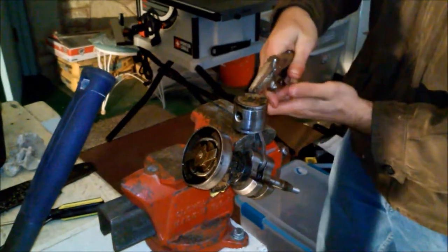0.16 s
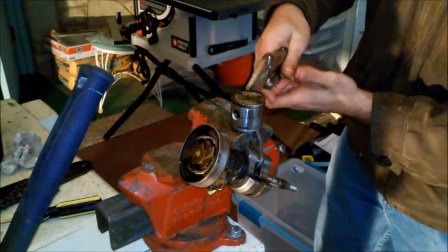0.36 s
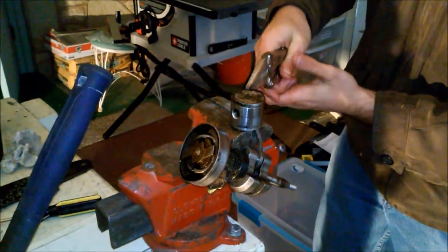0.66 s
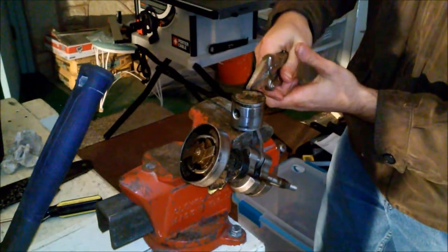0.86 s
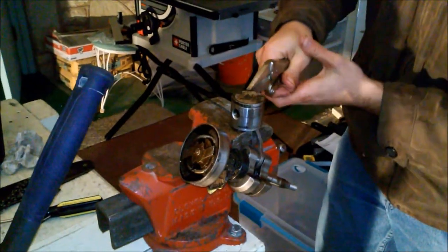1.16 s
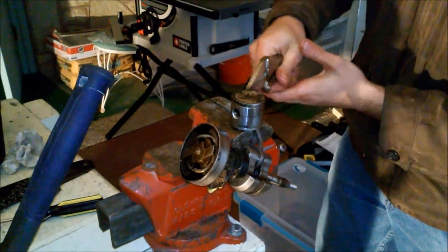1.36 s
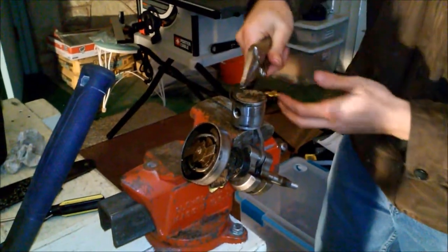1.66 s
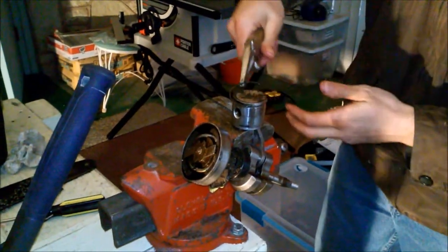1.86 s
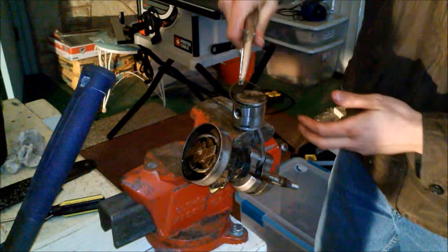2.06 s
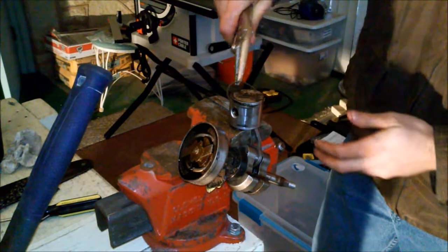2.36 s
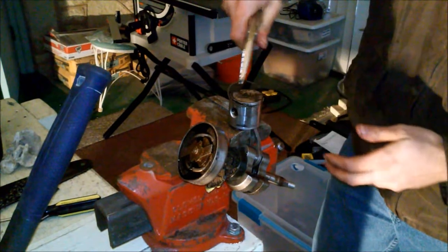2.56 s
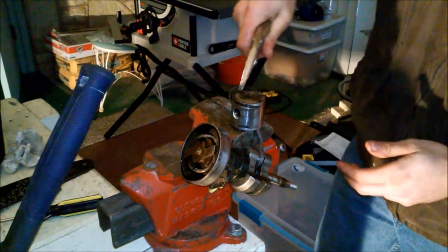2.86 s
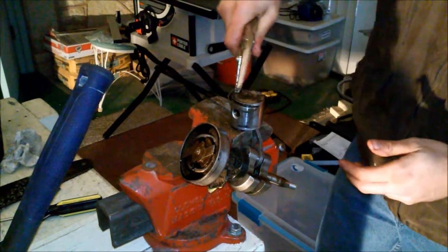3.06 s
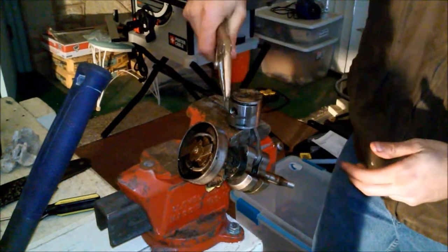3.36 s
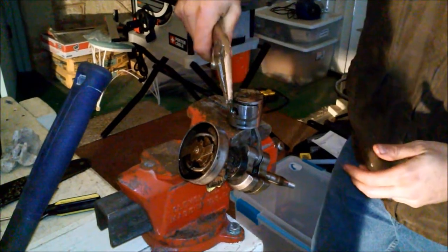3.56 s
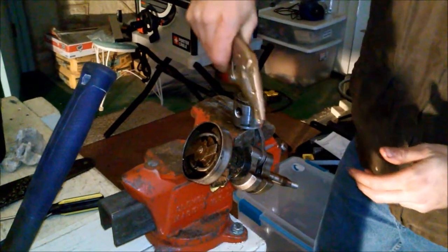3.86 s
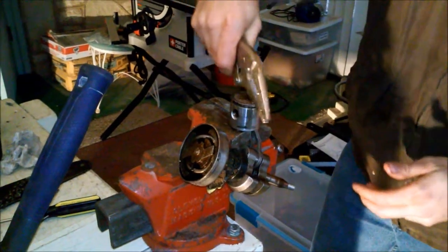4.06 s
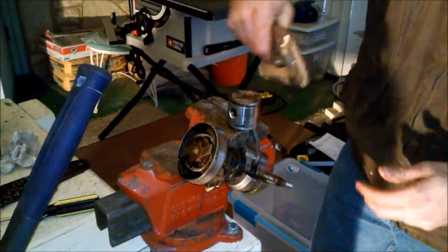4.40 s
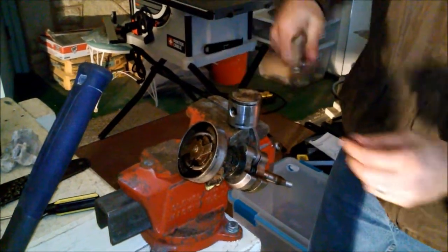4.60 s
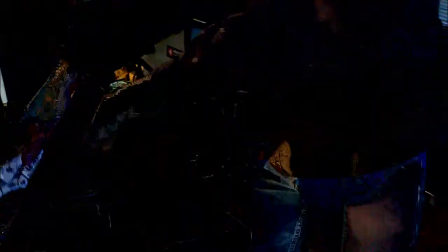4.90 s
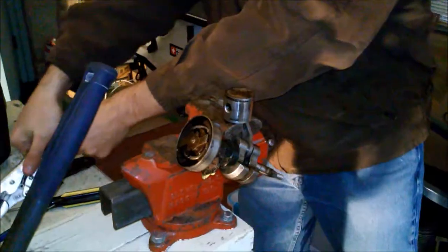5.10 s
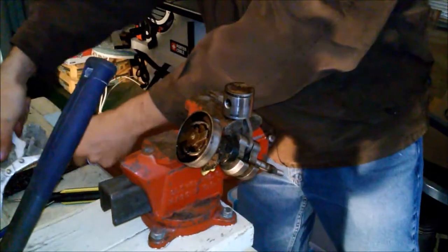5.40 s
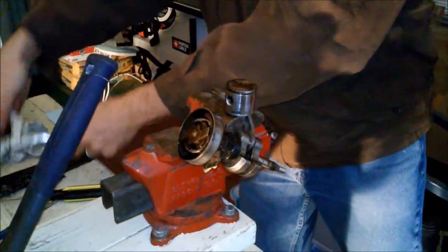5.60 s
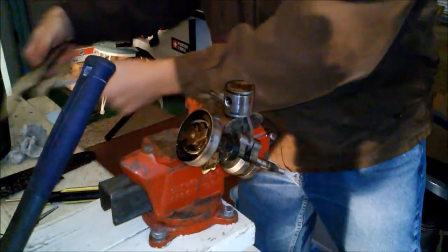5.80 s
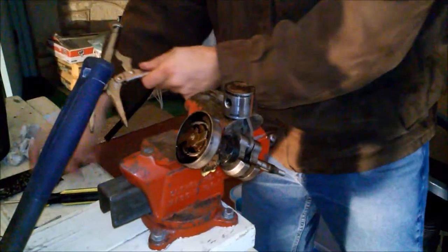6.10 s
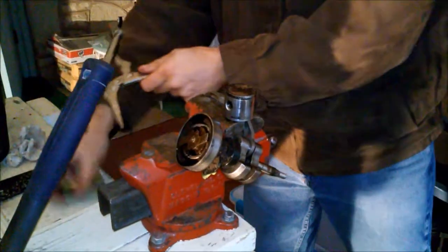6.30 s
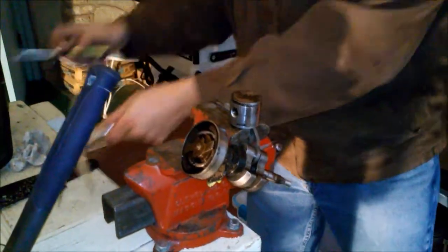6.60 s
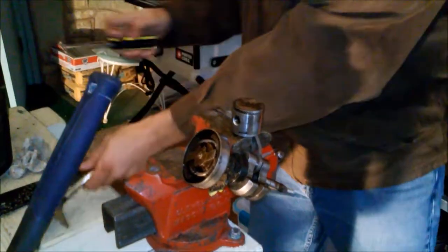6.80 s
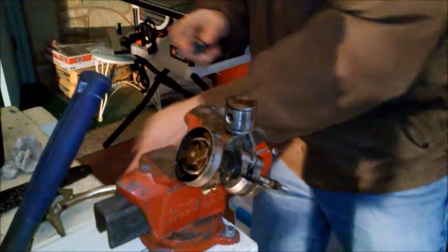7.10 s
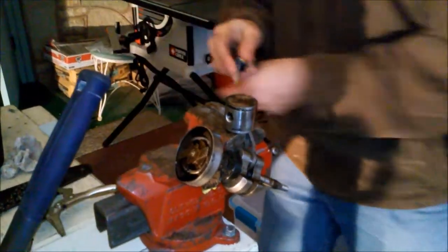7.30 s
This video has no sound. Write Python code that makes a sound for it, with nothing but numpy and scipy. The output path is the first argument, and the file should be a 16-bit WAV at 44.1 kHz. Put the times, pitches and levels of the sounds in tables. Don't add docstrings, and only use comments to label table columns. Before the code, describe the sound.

A close microphone in a small, hard-walled shed picks up hand tools on metal over low rumble and hiss, which swell after each contact and sink in pauses. At about 0.3-0.4 s pliers nudge and grip with quick, bright clicks. Around 1.0 s the jaws slip, then snap very loudly at 1.15 s, briefly overloading. A short squeak, dull knock and light flick follow at 1.65-1.75 s; a pin tap rings at 2.15 s. After a pause, a steel tool clinks at 3.8 s, ticks at 4.0 s and shuts sharply at 4.3 s. Fingers fumble faintly until 4.9 s. At 5.3-5.5 s tools are laid and dropped on the wooden bench, booming and clattering, with a light lift at 5.9 s and faint cloth rustle. Quiet until a brush at 6.8 s, then a heavy thud and clank at 6.9 s, jingling and rattling to 7.2 s, and a final click at 7.36 s.

```python
import sys
import numpy as np
from scipy import signal
from scipy.fft import rfft, irfft, next_fast_len
from scipy.io import wavfile
from scipy.ndimage import uniform_filter1d

SR = 44100
rng = np.random.default_rng(int(sys.argv[2]) if len(sys.argv) > 2 else 0)


def materialize(psi):
    bounded = np.clip(np.atleast_2d(psi).T, -1, 1)
    quanta = np.round(bounded * 32767).astype(np.int16)
    wavfile.write(sys.argv[1], SR, quanta)


def convert_level_to_amplitude(level_db):
    exponent = np.asarray(level_db, float) / 20
    return 10 ** exponent


N = 328540

# pitch_hz, width_hz, level_db (over the spectrum)
PLIERS_NUDGE = ([(0.283, -27, -12, 0.18)], [(290, -49), (500, -13), (2670, -18), (3670, -15), (12500, 3),
                (15800, -5)], [(3800, 200, 4), (6100, 200, 5.5)])
PLIERS_GRIP = ([(.352, -2.5, -12, .1), (.3615, -7, -5, .06), (.365, -5, -13, 0.25)], [(290, -51),
               (500, -27.5), (3470, -22), (4500, -20.5), (8130, -6.5), (13100, -3.5), (15800, -13)],
               [(1016, 55, 12.5), (4405, 360, 7), (6090, 200, .5), (13400, 150, 6.5)])
STEEL_SING = ([(.381, -15, -3, .07, .015)], [(4000, -40), (5000, -14), (10000, -8), (15800, 0.1)],
              [(5120, 60, 19), (7470, 80, 17), (10300, 60, 22), (15080, 50, 19)])
PLIERS_REGRIP = ([(.398, -2, -11, .09), (.406, -7, -15, .2), (.42, -27, -1, .5)], [(290, -51), (500, -23),
                 (1000, -20), (3780, -22), (15800, -4)], [(5990, 300, 7), (7300, 300, 3), (11500, 500, 1.5),
                 (15080, 45, 11)])
JAW_SLIP = ([(1.017, -23.5, -8, 0.4), (1.024, -4.5, -12, 0.22), (1.034, -13.5, -18, 0.4),
            (1.044, -11.5, -13, 0.4)], [(290, -44.5), (600, -22), (958, -14), (1280, -17.5), (1860, -17),
            (2500, -24), (3520, -27), (9950, 1.5), (15800, -11.5)], [(6100, 300, 1), (8700, 400, 9.3),
            (9950, 150, 3.4)])
JAW_SNAP = ([(1.148, -17, -12.5, 0.58), (1.158, 4.5, -7, 0.1), (1.165, -10.5, -2.5, 0.16, 0.9)],
            [(700, -32), (1400, -21), (4800, -21), (6640, -7.5), (8130, -14), (11200, -11), (13700, .5),
            (15800, -12.5)], [(1580, 110, 2), (2590, 94, -4), (4100, 300, -3), (6670, 170, 2.5),
            (10000, 900, 6)])
PLIERS_SQUEAK = ([(1.641, -24, -16, 0.4)], [(290, -46), (500, -17), (1780, -8), (3370, -28), (10700, -9),
                 (15800, -11)], [(1780, 73, 10.5), (5900, 460, 11), (11200, 1180, 4)])
PLIERS_CREAK = ([(1.682, -54, 1.2, 0.15)], [(1300, -30), (2050, 2), (6000, -12), (8000, -33)],
                [(2050, 120, 18), (5950, 100, 26)])
DULL_KNOCK = ([(1.72, -17, -8.5, 0.08), (1.745, -35, -1, 0.4)], [(180, -55), (300, -12), (458, 5),
              (640, -12), (1010, -9), (1220, -17.5), (5000, -37), (6500, -48.5)], [(990, 160, 5),
              (1970, 160, 7.2)])
BRIGHT_FLICK = ([(1.757, -20.5, -16, 0.17)], [(2500, -32), (8500, -17), (11400, -1), (15800, -17)],
                [(4400, 300, 5.6)])
PIN_TAP = ([(2.141, -2, -11, 0.49)], [(290, -21), (500, -4), (697, -29), (917, -19), (1250, -26),
           (5400, -24), (10500, 2), (15800, -4)], [(900, 60, 5.4), (1545, 140, 17), (1930, 220, 15),
           (2620, 51, 5.5), (4520, 300, 12), (6100, 400, 2)])
TOOL_TOUCH = ([(3.717, -41, -18, 0.3), (3.755, -15, -10, 0.4)], [(290, -56), (500, -24), (931, -21),
              (4560, -32.5), (7800, -24), (10500, -7.5), (15800, -12.5)], [(5870, 400, 14),
              (10840, 640, 5.6)])
TOOL_CLINK = ([(3.816, -13, -8, 0.04), (3.822, -15, -9, 0.55, 0.036)], [(180, -30), (300, -9), (927, -6.5),
              (3010, -15.5), (6040, -17), (7130, -26), (11300, -9), (15800, -14)], [(522, 50, 15),
              (983, 44, 3.2), (1600, 120, 6), (4400, 230, 3), (6000, 200, 3)])
CLINK_SPARK = ([(3.799, -11, -14, .09), (3.813, 4, -18, .09), (4.14, -30, -20, .14),
               (4.302, -13, -28, .09)], [(6000, -42), (9500, -10.5), (13000, 5), (15800, 1)], [])
TOOL_TICKS = ([(4.014, -17.5, -21.5, 0.39), (4.023, -30, -21, 0.35)], [(1470, -43), (4500, -36),
              (7080, -27), (7950, -19), (13000, -8.5), (15800, -19)], [(6050, 370, 9), (8200, 150, 9.9),
              (12900, 170, 6.7)])
TOOL_SHUT = ([(4.3021, -5.5, -16.5, 0.4), (4.3104, -14, -19, 0.4), (4.3214, -15, -14, 0.46)], [(880, -54),
             (1500, -35), (3900, -41), (6000, -33), (13100, 3.5), (15800, -16)], [(5050, 300, 11)])
FINGER_FUMBLE = ([(4.418, -52, -4, .15), (4.486, -43, -5, .2), (4.53, -53, -4, .2), (4.765, -54, -4, .15),
                 (4.796, -54, -4, .15), (4.91, -57, -4, .15)], [(350, -30), (650, 0.1), (1000, -2),
                 (1700, -12), (4000, -30)], [])
FAINT_PIP = ([(5.052, -62, -6.5, 0.14)], [(2000, -35), (2700, 1), (3800, -24)], [])
TOOL_LAY = ([(5.303, -9, -7.5, 0.55, 0.036), (5.314, -12, -15, 0.36)], [(196, -4), (501, -7), (615, -13.5),
            (2000, -27), (5500, -24), (8220, -19), (12900, -13), (15800, -16.5)], [])
BENCH_BUMP = ([(5.35, -3.5, -11, 0.28), (5.385, -12, -9, .2), (5.42, -11.5, -18.5, 0.5)], [(120, -44),
              (194, -2), (254, -15), (322, -4), (560, 0), (1500, -10), (3500, -24), (4550, -48)],
              [(586, 110, 2), (940, 73, 6)])
STEEL_DROP = ([(5.3657, -8.5, -7.5, 0.34), (5.3744, -8, -12.5, 0.26)], [(1180, -36), (2000, -6), (6500, -8),
              (8400, 0.5), (13400, -2.5), (15800, -14)], [(8417, 60, 9), (9420, 130, 9)])
STEEL_SETTLE = ([(5.421, -2, -12, .16), (5.433, -16, -9.5, 0.5), (5.5, -21.5, -10, 0.26)], [(710, -32),
                (1300, -4), (1800, -3), (2300, -16), (4620, -14), (12300, -4.5), (15800, -13)],
                [(10200, 490, 6.2), (12200, 500, 2)])
FAINT_CHIRP = ([(5.637, -62, 1.9, 0.4), (5.71, -65, 2.8, 0.25)], [(1200, -10.5), (1550, -1.5), (2000, -37)],
               [(1560, 45, 18)])
TOOL_LIFT = ([(5.91, -26, -17, 0.43)], [(1180, -57), (2000, -27), (5200, -4), (8330, 1), (15800, 3)],
             [(7400, 97, 15)])
CLOTH_RUSTLE = ([(6.03, -60, -1, .4), (6.254, -47, -9.5, 0.26), (6.29, -61, -5.5, 0.46)], [(240, -51.5),
                (400, -20), (856, -3.5), (1190, -20), (1920, -12.5), (2330, -26), (4000, -23), (5200, -54)],
                [(2670, 70, 4)])
HAND_BRUSH = ([(6.827, -25, -9, 0.5, 0.2)], [(90, -28), (426, 6), (800, -10), (1600, -12), (3280, -17),
              (7730, -26), (12600, -19.5), (15800, -33)], [(560, 150, 3), (888, 50, 3), (2760, 200, 5)])
BENCH_THUD = ([(6.9075, -1.2, -9.5, 0.29), (6.934, -4, -11, 0.42), (6.961, -8.5, -8, 0.58)], [(140, -24),
              (250, -1), (878, -4.5), (1170, -11), (1410, -1.5), (2520, -16), (7000, -30), (9100, -51)],
              [(480, 100, 1.5), (1450, 250, -1)])
BENCH_REBOUND = ([(7.142, -24, -5, .2)], [(250, -25), (520, -1), (1200, -16), (3000, -40)], [])
TOOLS_CLANK = ([(6.9077, -2, -13, 0.37), (6.9154, -2.5, -13.5, 0.43), (6.9526, -6.5, -13, 0.72)],
               [(1470, -36), (2500, -12.5), (3700, -14), (5500, -17), (9000, -5), (12600, 1.5),
               (15800, -10)], [(7480, 90, 8), (15100, 60, 6.9)])
TOOLS_JINGLE = ([(7.0569, -19, -11, 0.3), (7.0868, -19, -12, 0.5), (7.138, -33, -12, .3)], [(3500, -30),
                (5000, -12), (6140, 3), (8000, -5), (12500, 0), (15800, -3)], [(7400, 90, 10),
                (9600, 100, 8), (15100, 40, 17)])
TOOLS_RATTLE = ([(7.1826, -13, -12, 0.42)], [(1180, -44), (2000, -13), (4430, -19), (8400, -6), (15800, 0)],
                [(5140, 54, 6.2), (7470, 79, 10), (10100, 77, 6), (15100, 60, 8)])
TOOL_PICK = ([(7.357, -10, -11.5, 0.47)], [(180, -29), (425, -11), (1090, -17), (5000, -19), (12700, -0.5),
             (15800, -7.5)], [])

PIVOT_MODES = ([(.353, -27), (.365, -33), (.399, -30)], [(4450, 0, .03), (6050, -1, .03), (1016, -14, .3),
               (11600, -2, .04)])
HINGE_MODES = ([(1.024, -43), (1.044, -46), (1.09, -51)], [(960, -7, .4), (1100, -8, .4), (1798, -5, .18),
               (4005, -9, .12), (5259, -6, .33), (5814, -3, .3), (6212, -5, .5), (6546, 0, .2)])
JAW_MODES = ([(1.16, -33), (1.168, -32), (1.2, -33), (1.234, -32)], [(1620, -14, .25), (2590, -15, .3),
             (4100, -12, .25), (5400, -8, .3), (5819, -4, .3), (6665, -3, .32), (6804, -5, .3),
             (7208, -9, .35)])
HANDLE_MODES = ([(1.17, -38), (1.21, -39), (1.26, -40)], [(1150, 0, .4), (1480, -4, .4), (2550, -1, .35),
                (2850, -3, .35)])
HUM_MODES = ([(1.95, -70), (2.0, -73), (2.08, -71)], [(1850, 0, .4)])
PIN_MODES = ([(2.144, -40), (2.156, -42)], [(890, -10, .4), (1540, -6, .35), (1841, -9, .4),
             (2000, -8, .25), (2606, -14, .3), (4511, -7, .3), (4640, -10, .3), (6000, 5, .03),
             (4400, 2.5, .04)])
PISTON_MODES = ([(3.817, -33), (3.83, -37), (3.863, -36)], [(1000, -3, .35), (1500, -5, .2),
                (2000, -2, .12), (4600, -5, .05), (5200, -6, .04), (6050, -6, .25), (4400, -10, .4),
                (5000, -12, .4), (3100, -14, .4)])
PING_MODES = ([(4.303, -50)], [(5150, 0, .1)])
BENCH_TOUCHED_MODES = ([(5.3035, -25), (5.325, -29)], [(199, 0, .3), (323, -1, .4), (1000, -11, .15),
                       (560, -12, .2), (2400, -13, .12)])
BENCH_LAID_MODES = ([(5.35, -19), (5.369, -25), (5.387, -22), (5.401, -27), (5.421, -29)], [(199, -3, .14),
                    (323, -7, .15), (500, -6, .2), (614, 0, .2), (678, -7, .3), (980, -1, .15),
                    (1174, -9, .22), (1400, -10, .2), (1740, -6, .05), (2420, -11, .08)])
BENCH_THUMPED_MODES = ([(6.909, -19), (6.918, -20), (6.935, -20), (6.96, -22), (6.99, -27)],
                       [(194, -1, .28), (250, 1.5, .22), (440, -5, .35), (560, -7, .3), (684, -9, .35),
                       (870, -4, .22), (1104, -12, .35), (1443, -2.5, .4), (1632, -5, .15),
                       (1916, -12, .35), (2250, -10, .12)])
SOCKET_MODES = ([(5.368, -24), (5.42, -21)], [(1800, 0, .04), (2400, -5, .04), (3700, -8, .05)])
WRENCH_MODES = ([(6.911, -34), (6.927, -33), (6.956, -34), (6.99, -37), (7.032, -39)], [(1809, -3, .38),
                (1992, -2, .39), (2670, -5, .45), (2950, -1, .3), (3149, -7, .4), (3440, -10, .3),
                (3700, -13, .25)])
CHIME_MODES = ([(7.057, -23), (7.087, -28)], [(6300, 0, .018), (5900, -3, .015), (15090, -9, .2)])
KNUCKLE_MODES = ([(7.143, -34), (7.158, -31)], [(520, 0, .15), (440, -5, .15)])

# low_hz, high_hz, t60_share
SHED_BANDS = [
    (104, 500, 0.93),
    (500, 1200, 0.85),
    (1620, 3100, 0.83),
    (4500, 8200, 0.7),
    (9720, 20000, 0.55),
]
# pitch_hz, level_db (per Hz)
RUMBLE_SPECTRUM = [(12, -48.5), (20, -9.5), (101, 1.5), (184, 2), (335, -1.5), (492, -14.5), (600, -20),
                   (780, -52)]
# pitch_hz, level_db (per Hz)
MURMUR_SPECTRUM = [(260, -29), (450, -2.5), (617, -12), (951, -10.5), (1300, -14.5), (2600, -21),
                   (4000, -29), (7000, -31)]
# pitch_hz, level_db (per Hz)
HISS_SPECTRUM = [(1350, -39.5), (2300, -22), (2950, -18), (5630, -16), (8910, -8), (12600, 1.5),
                 (15200, -4.5), (15800, -8)]
# rest_level_db, rest_share, stir_share, open_level_db, lumpiness_db, lumps_per_s
BACKGROUND_LAYERS = [
    (-54, .5, 1.0, -40, 2.5, 14),
    (-65.5, .7, .6, -53, 1.8, 22),
    (-59, 1.0, 0, -44, .8, 25),
]
# start_s, level_db
GATE_REST = [(0, -9), (.14, -8), (.22, 2), (.7, -1), (.99, -7), (1.6, 2), (2.65, 3), (3.7, -1), (4.55, -2),
             (4.92, 4), (5.12, -5), (5.74, -3), (5.84, 8), (6.2, -4), (6.45, -15), (6.81, -11), (6.86, -2),
             (7.25, 12)]
# start_s, level_db
BACKGROUND_STIR = [(.1, 6), (.97, 5), (1.7, 1), (3.7, 0), (4.5, 5), (4.85, -6), (6.35, -8), (6.8, -20), (7.3, -8)]
# start_s, level_db, length_s
DIAPHRAGM_PUSH = (1.159, -5, 0.0018)

HOLD_S = .011
GATE_OPENS_DB, GATE_WIDE_DB, GATE_CLOSES_DB_PER_S, GATE_LAG_S = -55, -13, 100, .03
BLOW_SPREAD_DB, WAVER_DB, WAVERS_PER_S = 2.5, 4.5, 85


def colour(x, points):
    hz, db = np.transpose(points)
    size = next_fast_len(len(x) + 4096)
    bins_hz = np.arange(4097) * SR / 8192
    curve_db = np.interp(np.log(bins_hz + 1), np.log(hz), db, db[0] - 25.5, db[-1] - 39)
    cepstrum = irfft(np.log(convert_level_to_amplitude(curve_db)))[:4097] * np.r_[1, 2 * np.ones(4095), 1]
    pulse = irfft(np.exp(rfft(cepstrum, 8192)))[:4096]
    pulse = pulse / np.sqrt(np.sum(pulse ** 2))
    return irfft(rfft(x, size) * rfft(pulse, size), size)[:len(x)]


def drift(rate):
    knots = rng.standard_normal(300)
    return np.interp(np.arange(N) / SR * rate, np.arange(300), knots)


def background(opening):
    t = np.arange(N) / SR
    rest = np.interp(t, *np.transpose(GATE_REST))
    stir = np.interp(t, *np.transpose(BACKGROUND_STIR))
    spectra = [RUMBLE_SPECTRUM, MURMUR_SPECTRUM, HISS_SPECTRUM]
    out = 0
    for spectrum, layer in zip(spectra, BACKGROUND_LAYERS):
        rest_db, rest_share, stir_share, open_db, lumpy_db, rate = layer
        noise = colour(rng.standard_normal(N), spectrum)
        shut_db = rest_db + rest_share * rest + stir_share * stir
        level_db = shut_db + opening * (open_db - shut_db) + lumpy_db * drift(rate)
        out = out + noise * convert_level_to_amplitude(level_db)
    return out


def gate(strikes):
    fall = GATE_CLOSES_DB_PER_S * np.arange(N) / SR
    level = 10 * np.log10(uniform_filter1d(strikes ** 2, size=1024, origin=511) + 1e-12)
    held = np.maximum.accumulate(level + fall) - fall
    opening = np.clip((held - GATE_OPENS_DB) / (GATE_WIDE_DB - GATE_OPENS_DB), 0, 1)
    r = np.exp(-1 / (GATE_LAG_S * SR))
    return signal.lfilter([1 - r], [1, -r], opening)


def resonance(x, hz, width_hz):
    r = np.exp(-np.pi * max(width_hz, 5) / SR)
    poles = [1, -2 * r * np.cos(2 * np.pi * hz / SR), r * r]
    return signal.lfilter([(1 - r * r) / 2, 0, (r * r - 1) / 2], poles, x)


def shed_noise():
    white = rng.standard_normal(N)
    bands = []
    for low, high, share in SHED_BANDS:
        sos = signal.butter(2, [low, high], "band", fs=SR, output="sos")
        bands.append(signal.sosfilt(sos, white))
    bands = np.array(bands)
    bands[3:] *= -1
    return bands


def strike(contacts, spectrum, rings, bands, crack_s=.0018, swell_s=.0022):
    start = int(contacts[0][0] * SR)
    length = min(int(.75 * SR), N - start)
    spot = rng.integers(0, N - SR)
    knots = rng.standard_normal(500)
    flutter = 1.5 * np.interp(np.arange(length) / SR * 350, np.arange(500), knots)
    power = np.zeros((len(SHED_BANDS), length))
    for s, peak_db, haze_db, t60, *longer in contacts:
        hold = longer[0] if longer else HOLD_S
        t = np.maximum(np.arange(length) / SR + start / SR - s - .0008, 0)
        crack = (t > 0) * convert_level_to_amplitude(-4) * np.exp(-t / crack_s)
        swell = 1 - np.exp(-t / swell_s)
        held = t * t / (t + max(hold, .001))
        for k, (low, high, share) in enumerate(SHED_BANDS):
            decay_db = 60 * held / (max(t60, .03) * share)
            haze = swell * convert_level_to_amplitude(haze_db + flutter - decay_db)
            power[k] += convert_level_to_amplitude(peak_db) ** 2 * (crack ** 2 + haze ** 2)
    burst = np.sum(bands[:, spot:spot + length] * np.sqrt(power), axis=0)
    body = colour(burst, spectrum)
    rung = sum(convert_level_to_amplitude(db) * resonance(body, hz, width) for hz, width, db in rings)
    out = np.zeros(N)
    out[start:start + length] = body + rung
    return out


def ringing(blows, modes):
    out = np.zeros(N + SR)
    t = np.arange(SR // 2) / SR
    fade = np.minimum(t / .001, 1) * (1 - t / t[-1])
    hz, db, t60 = np.transpose(modes)[:, :, None]
    for s, blow_db in blows:
        chance = rng.standard_normal((len(modes), 1))
        phase = 2 * np.pi * rng.random((len(modes), 1))
        knots = rng.standard_normal((len(modes), 60))
        waver = np.array([np.interp(t * WAVERS_PER_S, np.arange(60), row) for row in knots])
        strength_db = blow_db + db + BLOW_SPREAD_DB * chance
        level = convert_level_to_amplitude(strength_db + WAVER_DB * waver - 60 * t / np.maximum(t60, .01))
        sines = np.sin(2 * np.pi * hz * t + phase + .65 * waver)
        start = int(s * SR)
        out[start:start + len(t)] += fade * np.sum(level * sines, axis=0)
    return signal.sosfilt(signal.butter(2, 160, "high", fs=SR, output="sos"), out[:N])


def sound(parts, bodies, bands):
    return sum(strike(*part, bands) for part in parts), sum(ringing(*body) for body in bodies)


def pliers(bands):
    parts = [PLIERS_NUDGE, PLIERS_GRIP, STEEL_SING, PLIERS_REGRIP, JAW_SLIP, JAW_SNAP,
             PLIERS_SQUEAK, PLIERS_CREAK, DULL_KNOCK, BRIGHT_FLICK]
    bodies = [PIVOT_MODES, HINGE_MODES, JAW_MODES, HANDLE_MODES, HUM_MODES]
    return sound(parts, bodies, bands)


def jolt():
    s, db, length = DIAPHRAGM_PUSH
    t = np.maximum(np.arange(N) / SR - s, 0) / length
    push = np.exp(-t) - .12 * np.exp(-t / 5)
    return convert_level_to_amplitude(db) * (t > 0) * (1 - np.exp(-t / .12)) * push


def pin(bands):
    return sound([PIN_TAP], [PIN_MODES], bands)


def clinking_tool(bands):
    parts = [TOOL_TOUCH, TOOL_CLINK, CLINK_SPARK, TOOL_TICKS, TOOL_SHUT, FINGER_FUMBLE, FAINT_PIP]
    return sound(parts, [PISTON_MODES, PING_MODES, BENCH_TOUCHED_MODES], bands)


def laying_down(bands):
    parts = [TOOL_LAY, BENCH_BUMP, STEEL_DROP, STEEL_SETTLE, FAINT_CHIRP, TOOL_LIFT, CLOTH_RUSTLE]
    return sound(parts, [BENCH_LAID_MODES, SOCKET_MODES], bands)


def clanking_tools(bands):
    parts = [HAND_BRUSH, BENCH_THUD, BENCH_REBOUND, TOOLS_CLANK, TOOLS_JINGLE, TOOLS_RATTLE, TOOL_PICK]
    bodies = [BENCH_THUMPED_MODES, WRENCH_MODES, CHIME_MODES, KNUCKLE_MODES]
    return sound(parts, bodies, bands)


def scene():
    bands = shed_noise()
    sources = [pliers, pin, clinking_tool, laying_down, clanking_tools]
    strikes, rings = map(sum, zip(*[source(bands) for source in sources]))
    return (strikes + background(gate(strikes)) + jolt() + rings)[None]


def top_cut(x):
    return signal.sosfilt(signal.butter(12, 16510, fs=SR, output="sos"), x)


def record(dry):
    cut = signal.sosfilt(signal.cheby2(10, 50, 16520, fs=SR, output="sos"), dry)
    return top_cut(np.clip(cut, -1, 1))


dry = scene()
out = record(dry)
materialize(out)
```